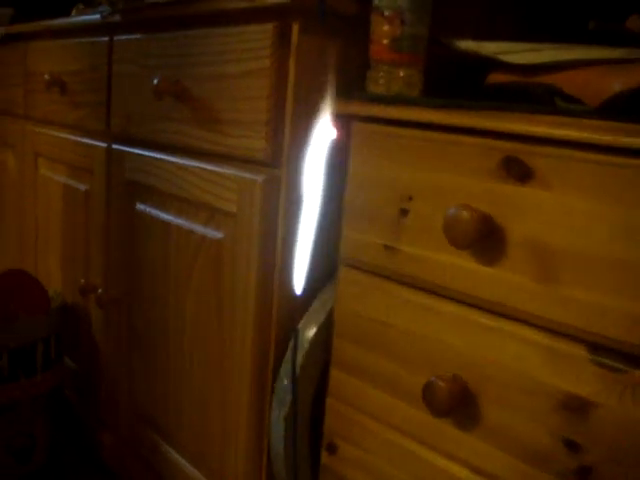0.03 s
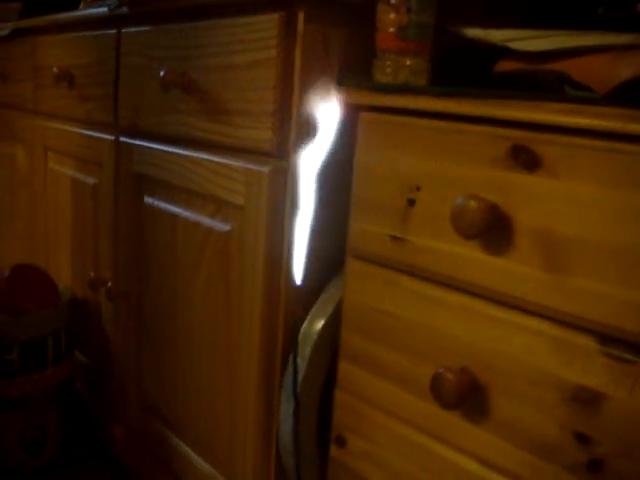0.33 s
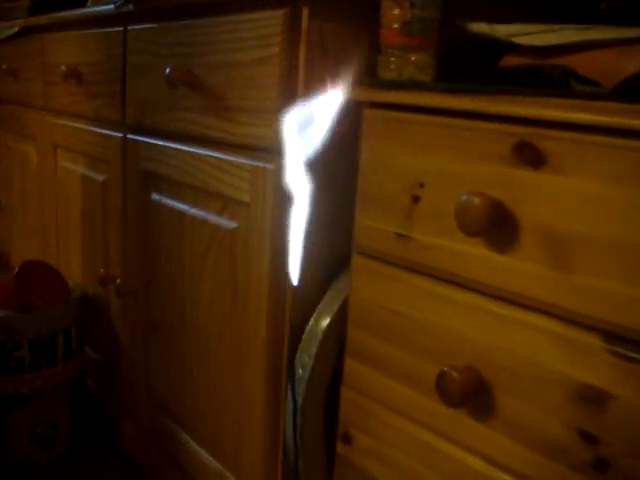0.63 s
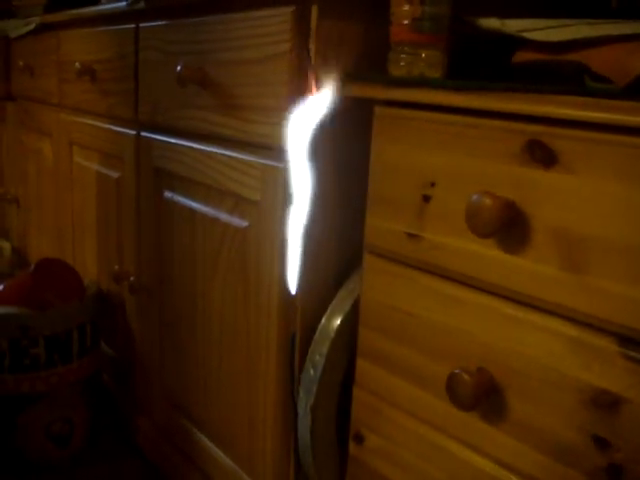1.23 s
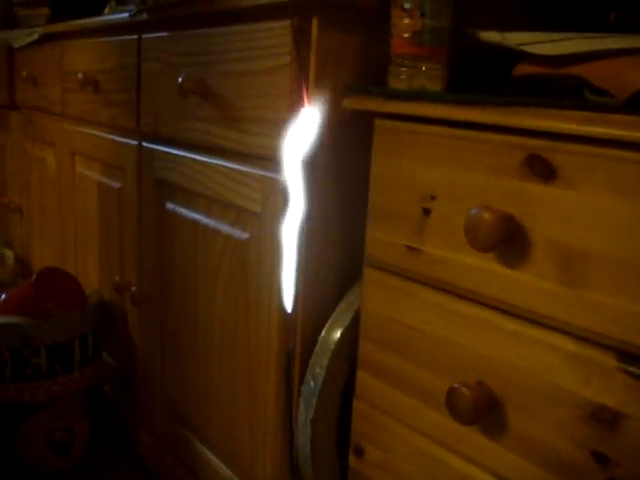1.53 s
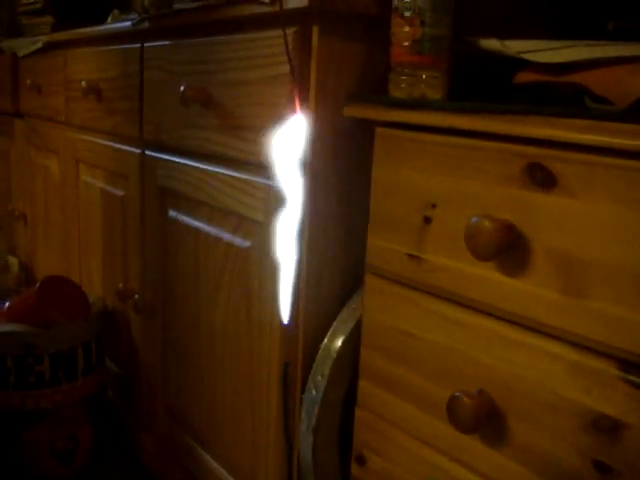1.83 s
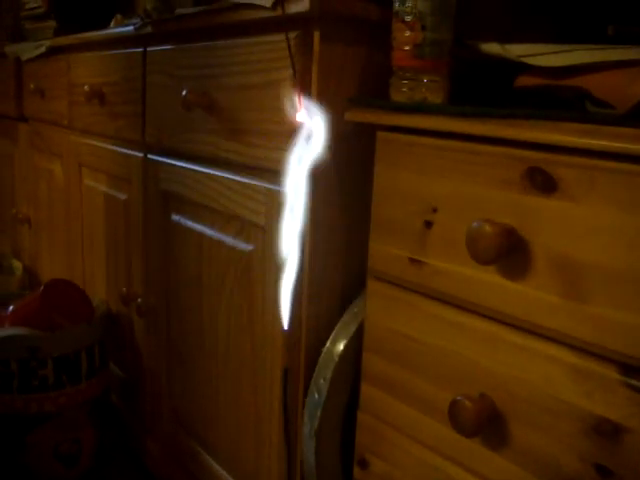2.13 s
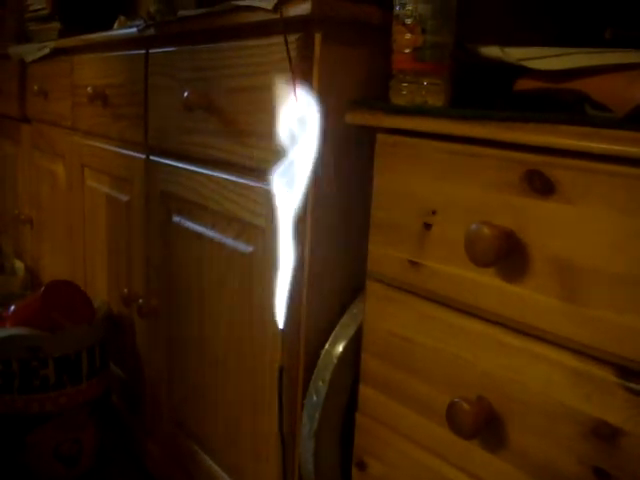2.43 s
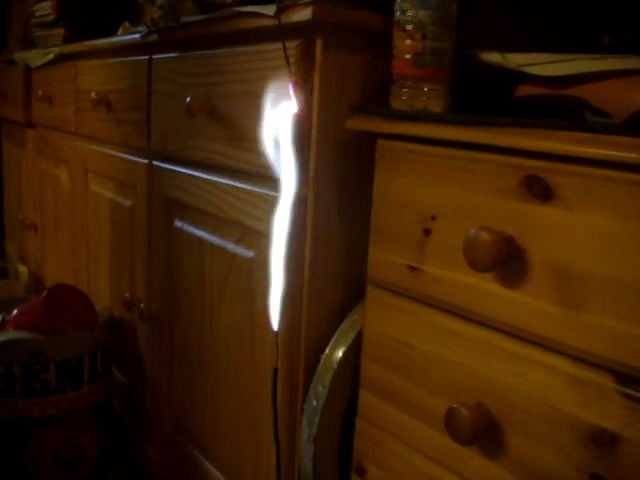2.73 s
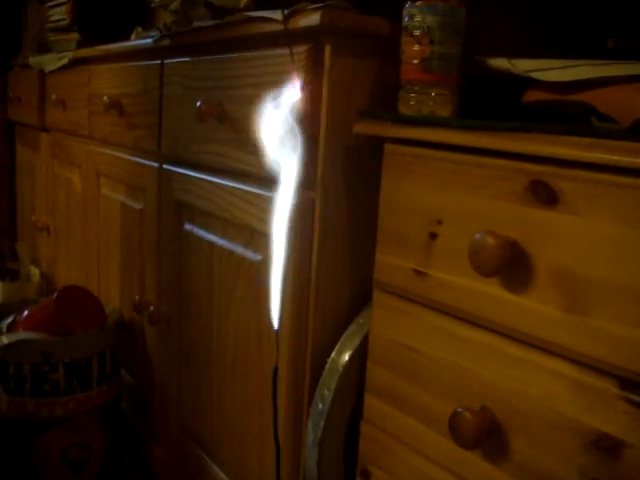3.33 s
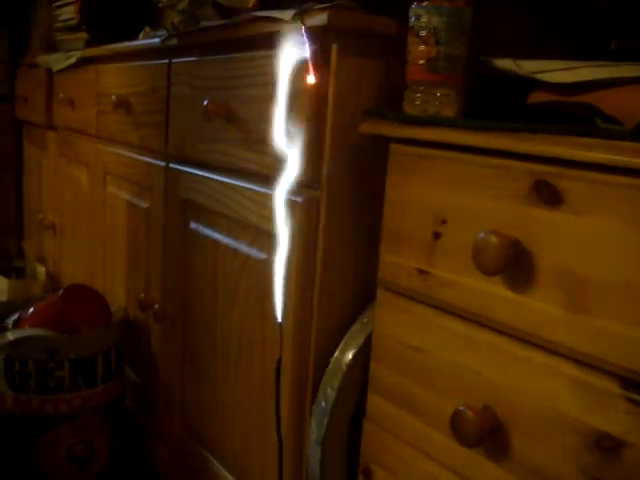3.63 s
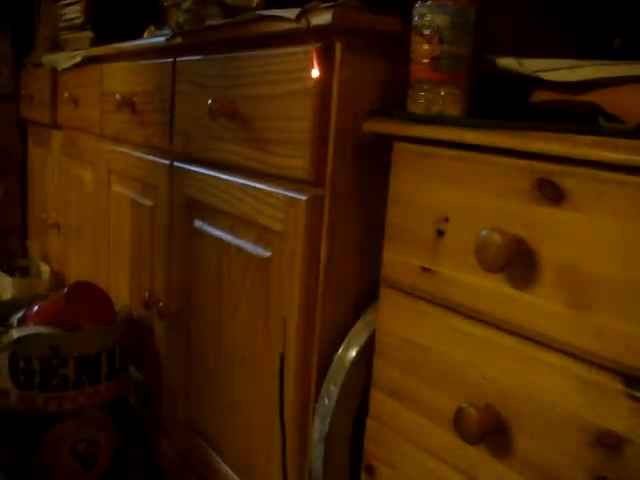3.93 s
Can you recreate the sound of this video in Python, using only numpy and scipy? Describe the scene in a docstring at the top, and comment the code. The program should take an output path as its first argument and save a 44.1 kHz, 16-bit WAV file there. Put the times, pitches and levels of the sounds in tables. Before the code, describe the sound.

An electric arc gives a harsh, hissing buzz close to the microphone in a small workshop. Even at first, it grows rough with sharp cracks, then cuts out near the end, and a quiet high whine remains.

```python
"""A high-voltage arc burns in front of wooden cabinets in a small workshop.
It starts as an even buzz of nearly 300 sharp sparks a second, with a bright hiss and a low flutter.
Soon it turns ragged and spits, as its glowing path bends and weak sparks fire early.
Near the end the arc breaks, and the thin whine of its power supply swells over a faint hiss."""
import sys
import numpy as np
from scipy import signal
from scipy.fft import rfft, irfft
from scipy.io import wavfile
from scipy.ndimage import uniform_filter1d

SR = 44100
rng = np.random.default_rng(int(sys.argv[2]) if len(sys.argv) > 2 else 0)


def to_wav(sig):
    """Store sig (one row per channel, or 1-D mono) as 16-bit WAV at the path in sys.argv[1].

    Samples outside -1..1 are clipped; the rate is SR.
    """
    pcm = np.clip(np.atleast_2d(sig), -1, 1) * 32767
    pcm = np.round(pcm).astype(np.int16)
    wavfile.write(sys.argv[1], SR, pcm.T)  # frames by channels


N = 176400
TIME = np.arange(N) / SR
ARC_END_S = 3.728
EARLY_GAP_S = .00258   # the short wait when sparks switch between strong and weak


def from_db(db):
    """Turn decibels into a number to multiply a sound by."""
    return 10 ** (np.asarray(db) / 20)


def rms_one(x):
    """Scale a signal so that its average size (rms) is 1."""
    return x / np.sqrt(np.mean(x ** 2) + 1e-20)


def in_time(rows):
    """Join a table's rows with straight lines: one curve for each column after the time."""
    times, *columns = np.transpose(rows)
    return [np.interp(TIME, times, column) for column in columns]


def response(points, size=4096):
    """Make a short click whose tone follows rows of (pitch_hz, level_db), for use as a filter."""
    hz, db = np.transpose(points)
    grid_hz = np.maximum(np.fft.rfftfreq(size, 1 / SR), 1)
    gains = from_db(np.interp(np.log(grid_hz), np.log(hz), db))
    # keep the tone, but pack the energy at the start of the click
    cepstrum = irfft(np.log(gains))
    cepstrum[1:size // 2] *= 2
    cepstrum[size // 2 + 1:] = 0
    click = irfft(np.exp(rfft(cepstrum)))
    return click / np.linalg.norm(click)


def through(x, impulse):
    """Give a sound the tone and ring of an impulse (a filter's answer to one click)."""
    return signal.fftconvolve(x, impulse)[:N]


def noise(points):
    """Noise of average size 1 whose tone follows rows of (pitch_hz, level_db)."""
    return rms_one(through(rng.standard_normal(N), response(points)))


def smooth(x, seconds):
    """Even out quick changes by averaging nearby samples twice."""
    width = max(int(seconds * SR), 1)
    return uniform_filter1d(uniform_filter1d(x, width), width)


def background():
    """A faint, even hiss, lower while the arc burns."""
    # tone of the hiss: pitch_hz, level_db
    tone = [(20, -3), (60, 0.5), (300, -2), (1000, -1), (4300, 0.5), (7000, 2.5), (10000, 2.5)]
    level_db, dip_db = -55.5, -8.5
    burning = smooth(1. * (TIME < ARC_END_S), .05)
    return from_db(level_db + dip_db * burning) * noise(tone)


def supply_whine():
    """With no arc left to feed, the power supply starts to whine, each tone wavering in level."""
    # tones of the whine: multiple of the pitch, level_db
    tones = [(1, -54.5), (2, -58), (3, -61), (4, -62.5), (5, -56), (6, -69), (7, -70), (8, -75),
             (10, -71.5)]
    pitch_hz, rise_s, waver_db = 899.6, 0.099, 1.2
    swell = 1 - np.exp(-np.maximum(TIME - ARC_END_S, 0) / rise_s)
    whine = 0
    for multiple, db in tones:
        waver = rms_one(smooth(rng.standard_normal(N), 0.038))
        wave = np.sin(2 * np.pi * (multiple * pitch_hz * TIME + rng.random()))
        whine = whine + from_db(db + waver_db * waver) * wave
    return np.sqrt(2) * swell * whine


def hiss_and_flutter():
    """A hiss with a thin, bright top edge and a low flutter go with the sparks, and stop with them."""
    # how the hiss rises and falls: time_s, level_db
    hiss_levels = [(0.0, -30.5), (0.4, -32), (0.54, -35.5), (0.61, -27.5), (0.73, -35), (0.76, -28),
                   (0.81, -36), (0.84, -33.5), (0.95, -34), (1.02, -26.5), (1.05, -32.5), (2.31, -30.5),
                   (2.37, -29), (2.49, -34), (2.59, -28.5), (2.64, -35), (2.66, -29), (2.72, -35),
                   (2.76, -30), (2.84, -33.5), (2.87, -28), (2.94, -34), (2.97, -31), (3.4, -32),
                   (3.5, -28), (3.53, -34), (3.59, -29), (3.67, -31.5), (3.72, -29)]
    # how the low flutter rises and falls: time_s, level_db
    flutter_levels = [(0.2, -83), (1.03, -75), (1.05, -82.5), (1.77, -74.5), (1.8, -77), (2.32, -76),
                      (2.34, -62), (2.37, -71), (2.81, -79), (2.91, -68), (2.97, -78), (3.72, -78)]
    # tone of the hiss: pitch_hz, level_db
    hiss_tone = [(100, -38.5), (1000, -2), (3000, 5.5), (5500, 7), (6800, 3.5), (8500, 0.5), (9600, 6),
                 (11000, -9)]
    # tone of the flutter: pitch_hz, level_db
    flutter_tone = [(20, 1), (55, -5.5), (110, -3), (200, -5.5), (330, -10), (1000, -43)]
    hiss_boost_db, flutter_boost_db, fade_s = 1, 2, 0.013
    hiss_db, = in_time(hiss_levels)
    flutter_db, = in_time(flutter_levels)
    hiss = from_db(hiss_db + hiss_boost_db) * noise(hiss_tone)
    flutter = from_db(flutter_db + flutter_boost_db) * noise(flutter_tone)
    dying = from_db(-60 * np.maximum(TIME - ARC_END_S, 0) / fade_s)
    return dying * (hiss + flutter)


def room_ring(clicks):
    """Sound scatters quickly off the furniture; the walls ring on, fainter and duller."""
    # tone of the room's ring: pitch_hz, level_db
    tone = [(60, -33.5), (240, -18.5), (310, -10), (410, -16), (520, -12.5), (600, -3.5), (800, -4.5),
            (900, 1), (1060, -8.5), (1220, 7), (1360, -5), (1520, 6), (1720, -8), (2000, 1), (3500, -1),
            (4250, 3), (5700, 0.5), (6800, -4), (10000, -6)]
    furniture_fade_s, walls_fade_s = 0.055, 0.35   # time to fall by 60 dB
    ring_db, walls_db, delay_s = -12.8, -12.5, 0.0012
    t = TIME[:SR // 2]
    furniture, walls = rng.standard_normal((2, len(t)))
    furniture *= from_db(-60 * t / furniture_fade_s)
    walls = signal.sosfilt(signal.butter(1, 4400, fs=SR, output="sos"), walls)
    walls *= from_db(walls_db - 60 * t / walls_fade_s)
    tail = (furniture + walls) * (t > delay_s)
    ring = signal.fftconvolve(tail / np.linalg.norm(tail), response(tone))
    return from_db(ring_db) * through(clicks, ring)


def cabinet_echoes(direct):
    """The narrow cabinet faces throw back only the treble."""
    # echoes off the cabinets: delay_s, level_db
    echoes = [(.00147, -12), (.0017, -24.5), (.00238, -23.5), (.0036, -22)]
    treble = signal.sosfilt(signal.butter(1, 940, "high", fs=SR, output="sos"), direct)
    return sum(from_db(db) * np.interp(TIME - delay_s, TIME, treble, left=0) for delay_s, db in echoes)


def lengthen_arc(clicks):
    """As the arc is drawn longer, each spark gains bass and loses treble."""
    # tone change as the arc stretches: time_s, bass_db, treble_db
    stretch = [(0, -15.5, 0), (.5, -5, -1), (1.3, -2, -2), (2.3, -.5, -2.5), (3.7, -2, -1.5)]
    bass_db, treble_db = in_time(stretch)
    bass = signal.sosfiltfilt(signal.butter(2, 604, fs=SR, output="sos"), clicks + 1e-18)
    treble = signal.sosfiltfilt(signal.butter(4, 5800, "high", fs=SR, output="sos"), clicks + 1e-18)
    return clicks + (from_db(bass_db) - 1) * bass + (from_db(treble_db) - 1) * treble


def with_spits(clicks):
    """The bent arc spits: two equal, quick cracks take the place of an ordinary spark."""
    # the hardest spits: start_s, level_db (compared with a strong spark)
    spits = [(.749, 1.5), (.863, -1), (1.501, 1), (2.079, 1), (2.158, 1), (2.339, 1), (2.558, .5),
             (2.568, -1), (2.664, -1.5), (2.865, -1), (3.009, 1.5), (3.357, 1), (3.422, 1), (3.433, 1.5),
             (3.567, 2), (3.626, -2.5), (3.706, -1)]
    split_s = .00023
    out, clear = clicks.copy(), int(EARLY_GAP_S * SR * 2 / 3)
    for start_s, db in spits:
        i = int(start_s * SR)
        out[i - clear:i + clear] = 0
        out[[i, i + int(split_s * SR)]] = from_db(db)
    return out


def sparks():
    """Each spark jumps through the air with a strong or weak click; a bent path adds a second click."""
    # how the arc fires: time_s, sparks_per_s, weak_share (0-1), scatter (share of the gap in time)
    firing = [(0, 257, 0, .011), (.05, 251, 0, .011), (.18, 264, 0, .011), (.255, 255, 0, .014),
              (.29, 291, 0, .018), (.325, 266, 0, .018), (.37, 274, 0, .02), (.395, 300, 0, .02),
              (.425, 284, .05, .025), (.47, 288, .45, .03), (.58, 290, .3, .035), (.8, 288, .6, .055),
              (1.04, 292, .55, .05), (1.09, 293, .05, .022), (1.38, 293, .21, .027), (1.7, 290, .42, .04),
              (2.2, 288, .55, .08), (2.37, 258, .55, .07), (2.9, 275, .55, .11), (3.7, 266, .6, .12)]
    # how the sparks' loudness rises and falls: time_s, level_db
    levels = [(0.0, -23), (0.4, -23), (0.47, -25.5), (0.6, -24.5), (0.73, -26), (0.76, -22.5), (0.78, -27),
              (0.84, -25.5), (0.92, -24.5), (0.94, -27.5), (0.98, -25), (1.04, -26.5), (1.1, -25),
              (1.73, -26), (1.76, -21), (1.78, -27.5), (1.82, -25), (1.84, -28), (1.91, -25.5), (2.33, -25),
              (2.34, -21.5), (2.37, -21.5), (2.39, -26), (2.48, -24.5), (2.49, -27), (2.54, -22.5),
              (2.65, -25.5), (2.66, -21.5), (2.7, -28), (2.76, -21.5), (2.795, -28.5), (2.81, -25.5),
              (2.85, -29.5), (2.86, -23.5), (2.91, -24), (2.93, -26), (2.99, -26), (3.0, -24),
              (3.34, -25.5), (3.39, -27.5), (3.425, -23), (3.44, -26.5), (3.52, -23), (3.53, -27),
              (3.56, -23.5), (3.68, -26.5), (3.7, -22.5), (3.72, -23)]
    weak_db, weak_spread_db, strong_spread_db, boost_db = -7.9, 1.3, 2.0, 0.5
    late_share, late_stretch, slip_s = .2, 1.3, .00004
    bend_delay_s, bend_gain = 0.00024, 1.26
    ripple_hz, ripple_db, ripple_share = 100, 1.04, .012   # mains power sways strength and timing
    rate, weak_share, scatter = in_time(firing)
    level_db, = in_time(levels)
    surge_db = level_db - level_db.mean()
    weak_share = np.clip(weak_share * (1 - .54 * surge_db), 0, .8)   # surges have fewer weak sparks
    ragged = 0.067 + weak_share   # a little uneven even with no weak sparks
    ripple = np.sin(2 * np.pi * ripple_hz * TIME)
    wander = .7 * rms_one(smooth(rng.standard_normal(N), .014))   # the firing rate drifts
    clicks, t, was_weak = np.zeros(N), 0, False
    chances, nudges = rng.random((2000, 3)), rng.standard_normal((2000, 4))
    for (pick, late, bend), (jitter, size, kink, slip) in zip(chances, nudges):
        i = int(t * SR)
        weak = pick < weak_share[i] * (.7 if was_weak else 1)
        gap_s = EARLY_GAP_S if weak != was_weak else 1 / rate[i]
        if late < late_share * weak_share[i]:   # some sparks hang back
            gap_s = late_stretch / rate[i]
        t += gap_s * np.exp(scatter[i] * (jitter + wander[i]) - ripple_share * ripple[i])
        if t > ARC_END_S:
            break
        spark_db = weak_db + weak_spread_db * size if weak else strong_spread_db * ragged[i] * size
        strength = from_db(spark_db)
        strike_s = abs(t + slip_s * slip)   # a hair before or after it is due
        second_s = strike_s + bend_delay_s * (.7 + .6 * bend)
        clicks[int(strike_s * SR)] += strength
        clicks[int(second_s * SR)] += strength * min(bend_gain * scatter[i] * kink ** 2, 1)
        was_weak = weak
    clicks = with_spits(clicks)
    # even out the loudness, then make it follow the level curve
    burning = smooth(1. * (TIME < ARC_END_S), 0.014)
    power = (np.abs(smooth(clicks ** 2, 0.023)) + 1e-9) / (np.abs(burning) + 1e-9)
    return -clicks / np.sqrt(power) * from_db(level_db + boost_db + ripple_db * ragged * ripple)


def arc():
    """The sparks are heard directly, then off the cabinets and around the room."""
    # tone of one spark: pitch_hz, level_db
    tone = [(60, -48), (245, -33.5), (310, -24), (410, -30), (520, -11.5), (640, -12.5), (800, -11.5),
            (890, -6), (1060, -10), (1220, .5), (1360, -6), (1540, -2), (1720, -5.5), (2000, -1),
            (3500, 0.5), (4250, 1), (5700, -2.5), (6900, -9), (8000, -8), (10000, -13)]
    clicks = lengthen_arc(sparks())
    direct = through(clicks, response(tone))
    return direct + cabinet_echoes(direct) + room_ring(clicks)


def scene():
    """Add up all the sounds, the same on the left and the right."""
    mono = arc() + hiss_and_flutter() + supply_whine() + background()
    return np.array([mono, mono])


def record(dry):
    """Round off the tallest clicks and cut the highest treble."""
    ceiling, cutoff_hz = 1.06, 10030
    rounded = ceiling * np.tanh(dry / ceiling)
    lowpass = signal.firwin(601, cutoff_hz, window="blackman", fs=SR)
    return signal.fftconvolve(rounded, lowpass[None], mode="same", axes=1)


dry = scene()
out = record(dry)
to_wav(out)
```